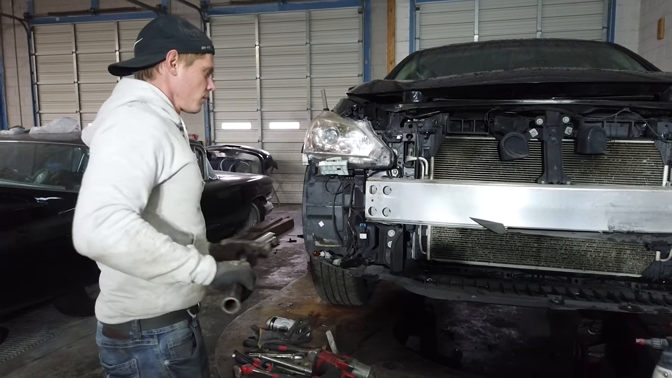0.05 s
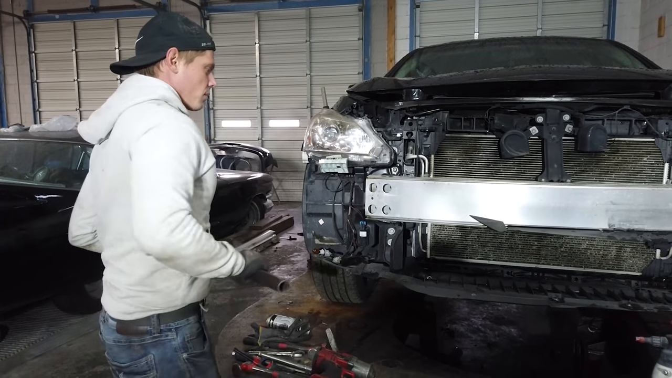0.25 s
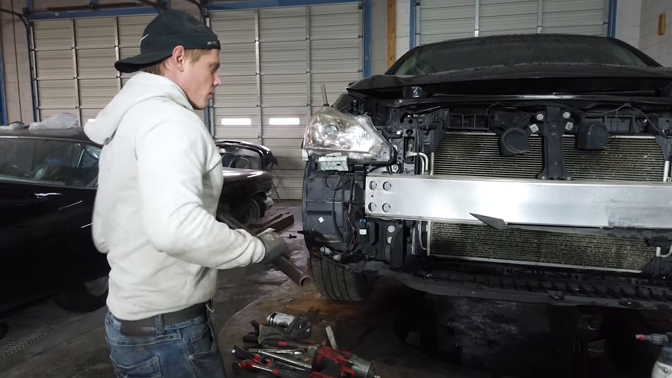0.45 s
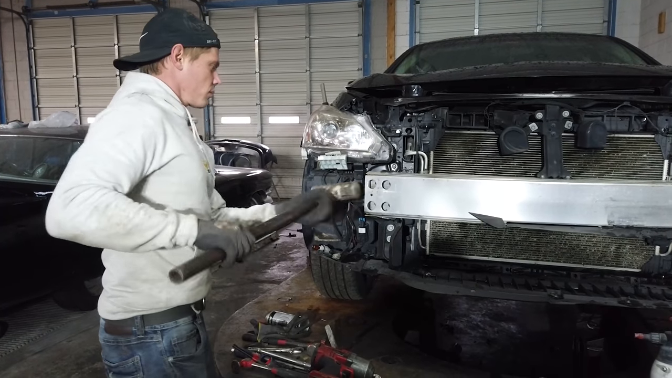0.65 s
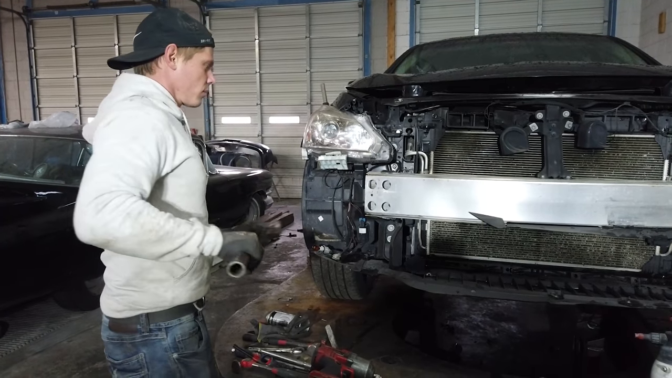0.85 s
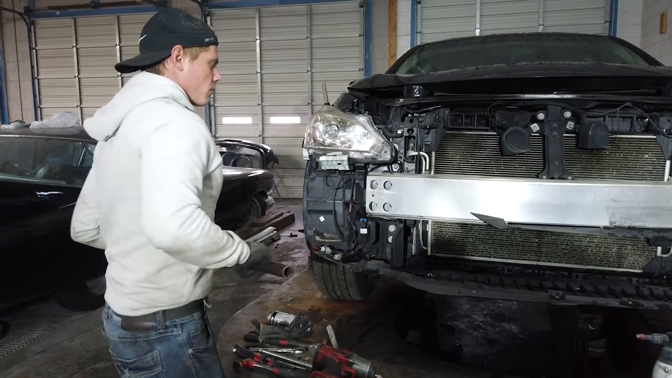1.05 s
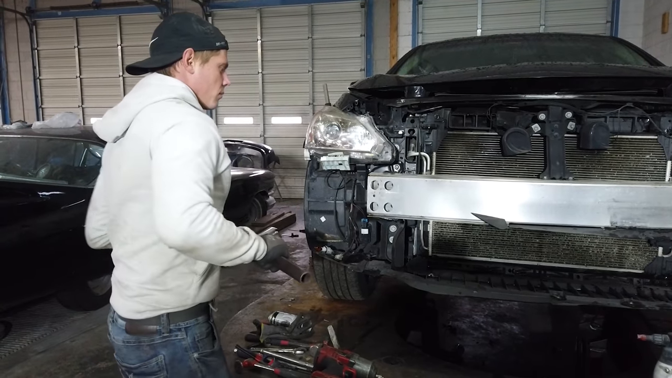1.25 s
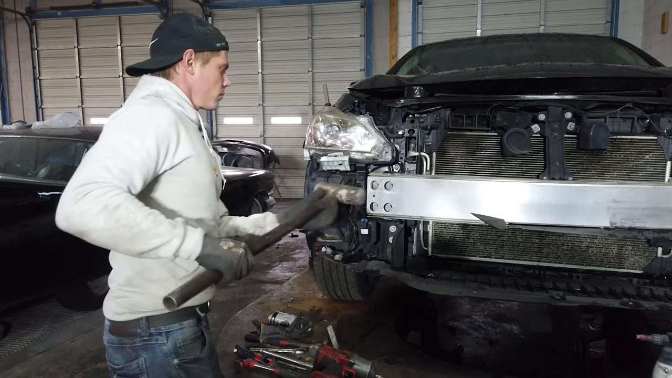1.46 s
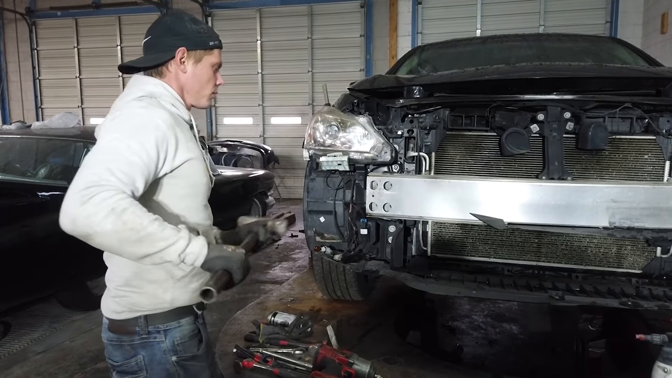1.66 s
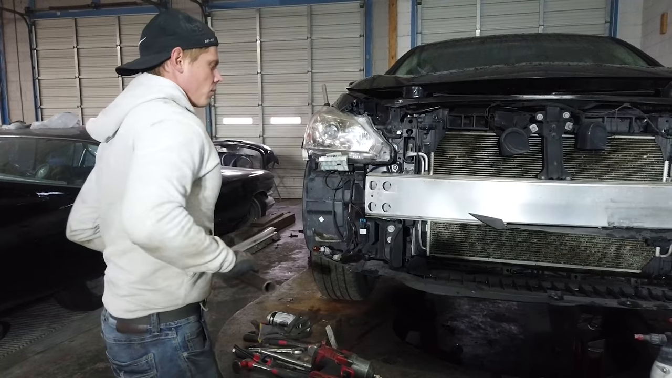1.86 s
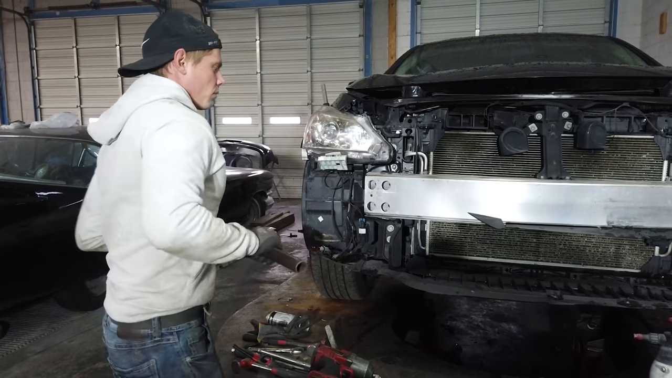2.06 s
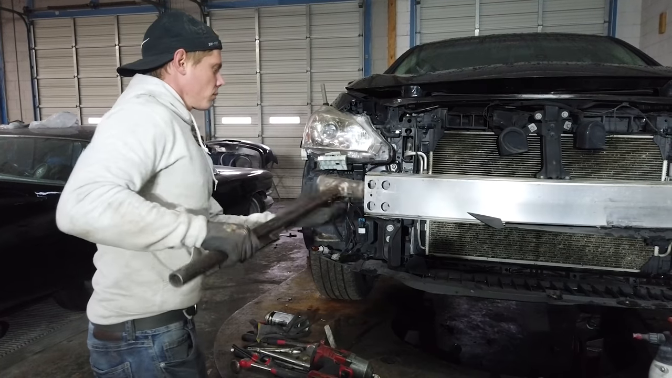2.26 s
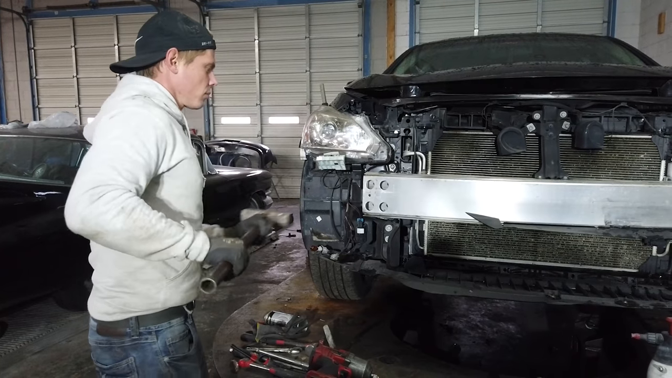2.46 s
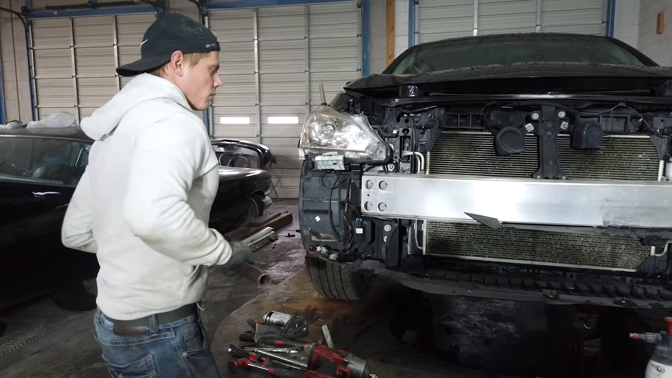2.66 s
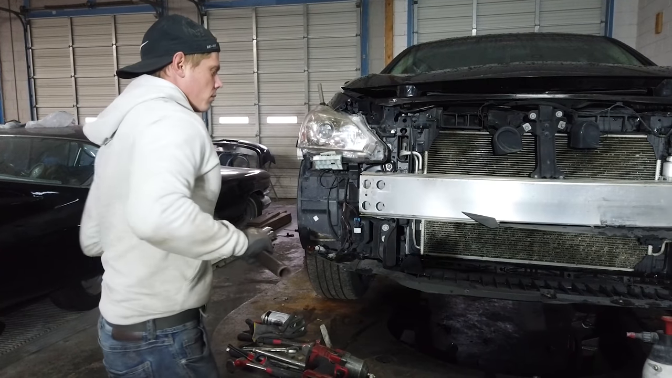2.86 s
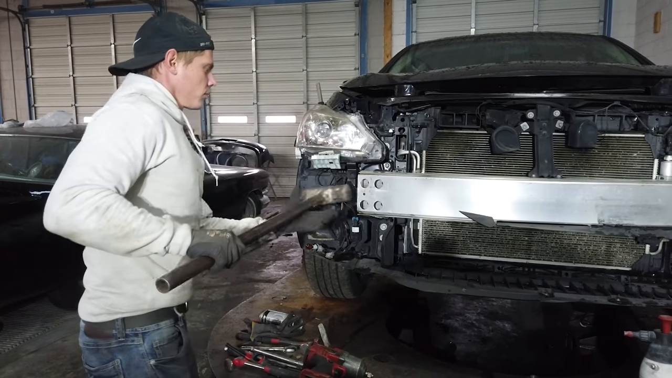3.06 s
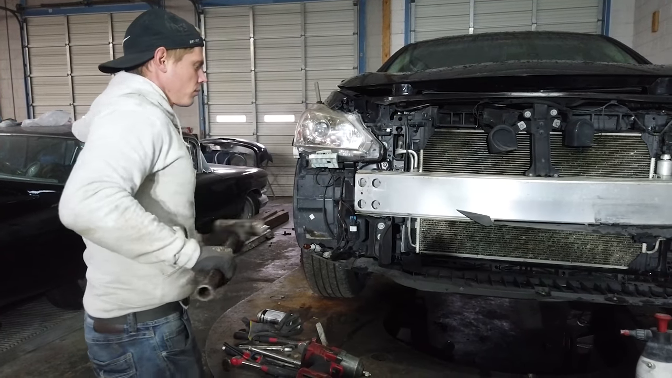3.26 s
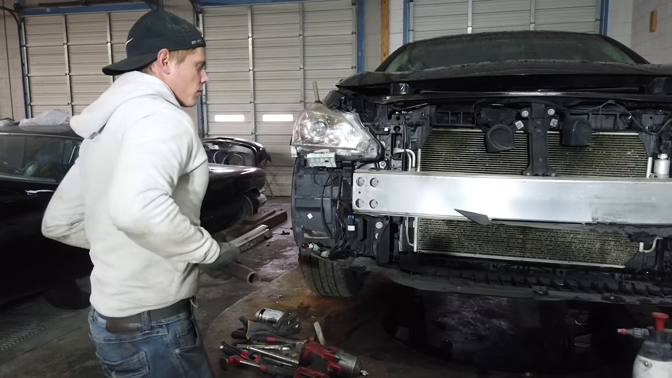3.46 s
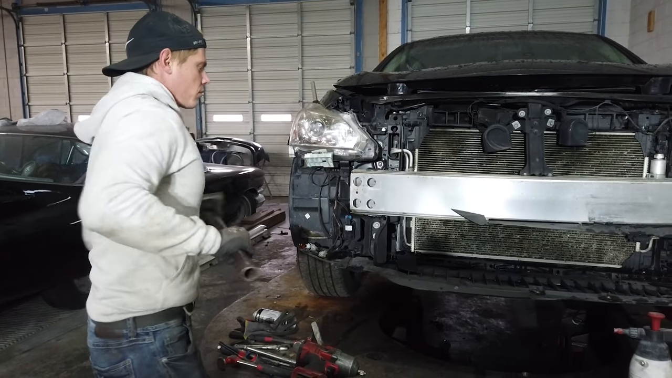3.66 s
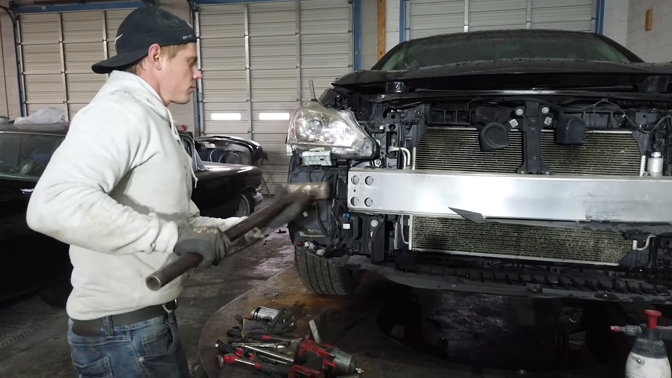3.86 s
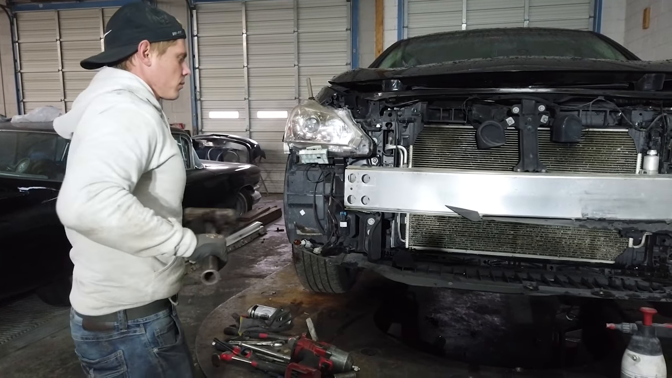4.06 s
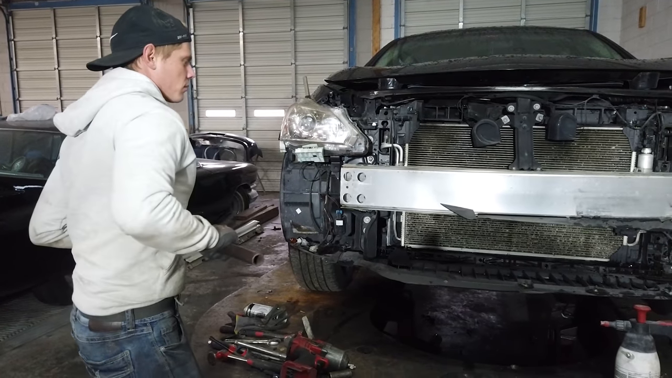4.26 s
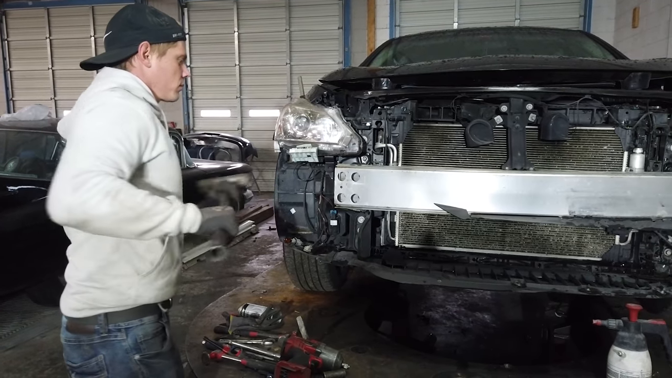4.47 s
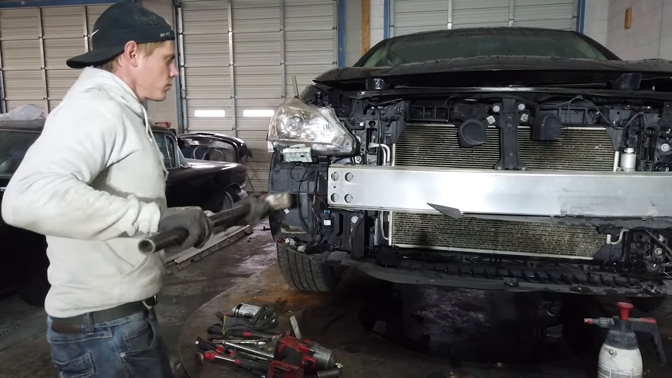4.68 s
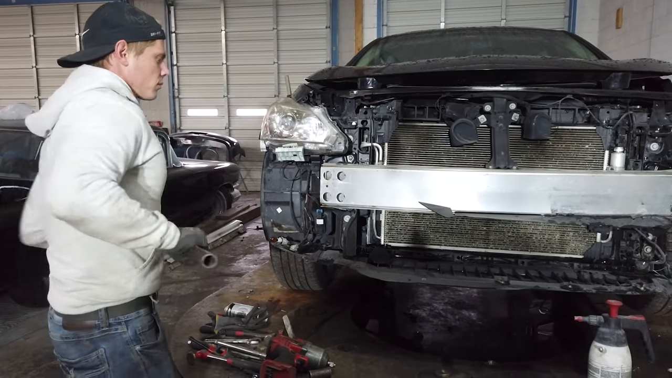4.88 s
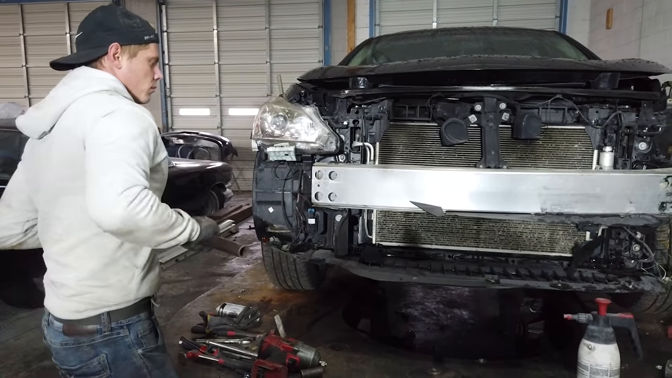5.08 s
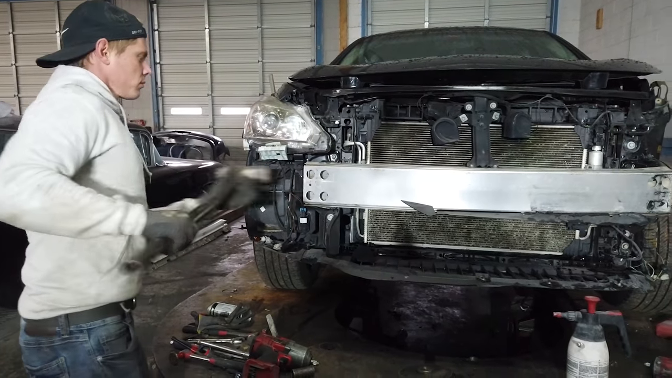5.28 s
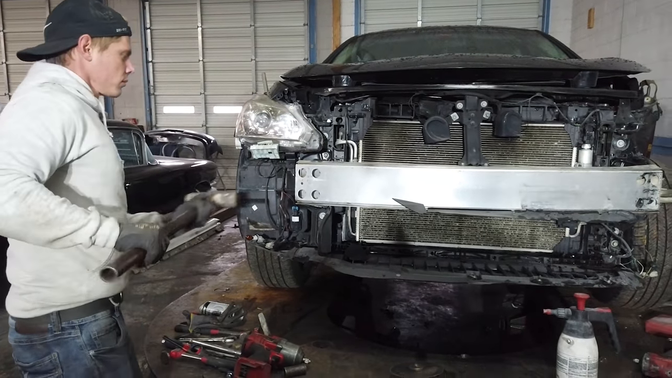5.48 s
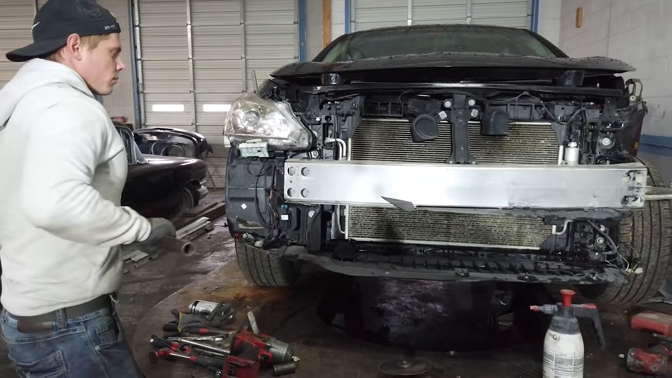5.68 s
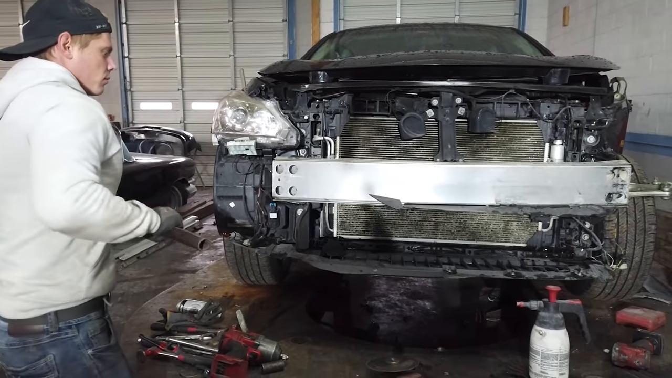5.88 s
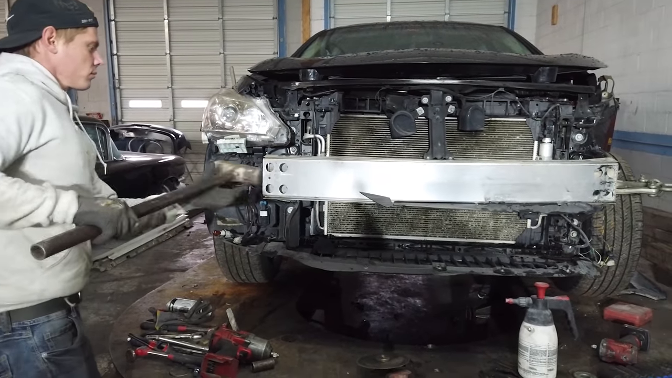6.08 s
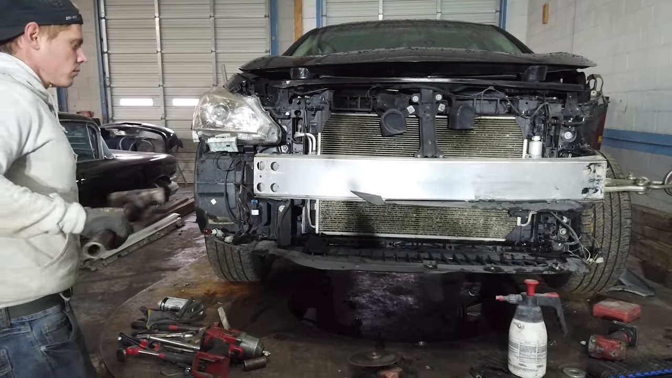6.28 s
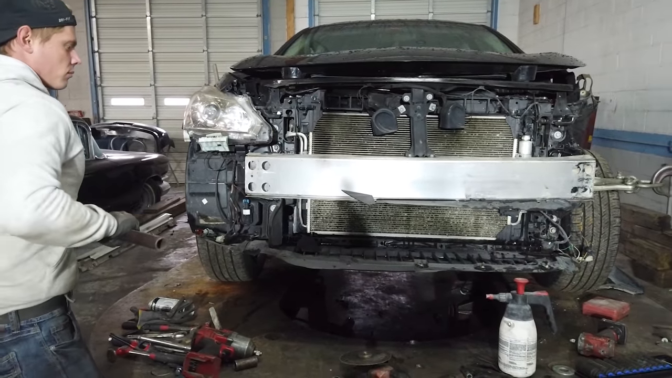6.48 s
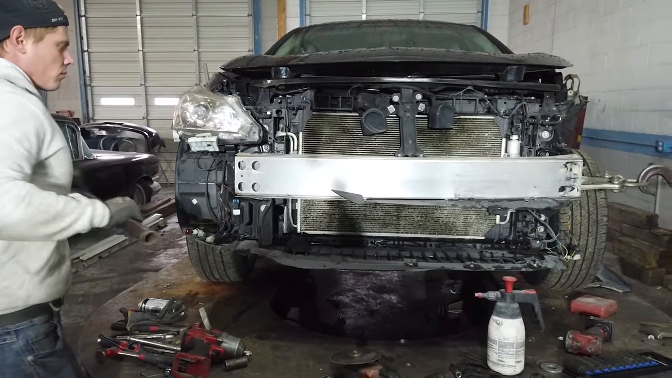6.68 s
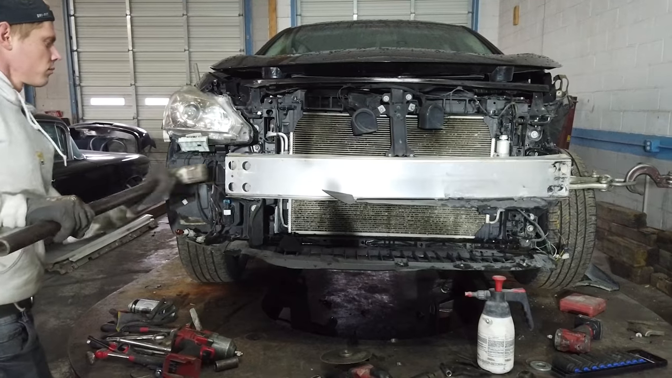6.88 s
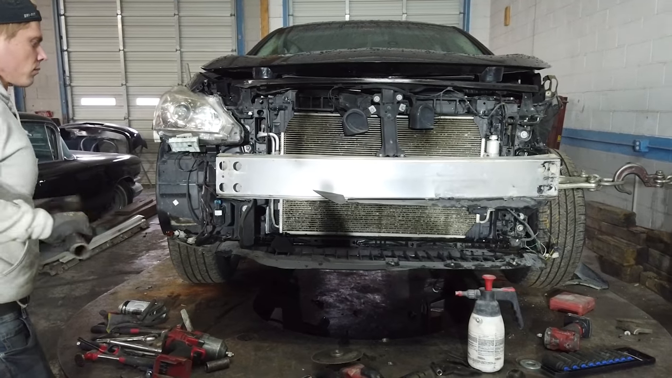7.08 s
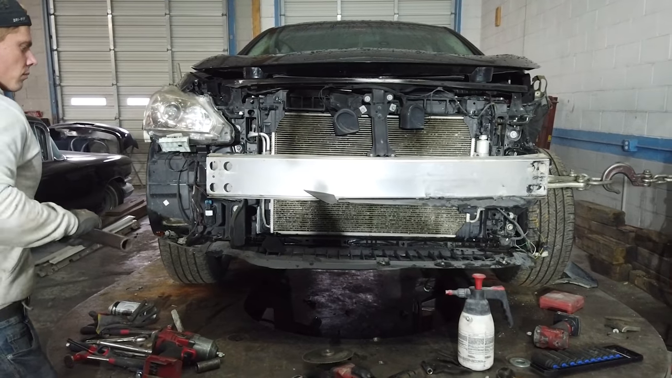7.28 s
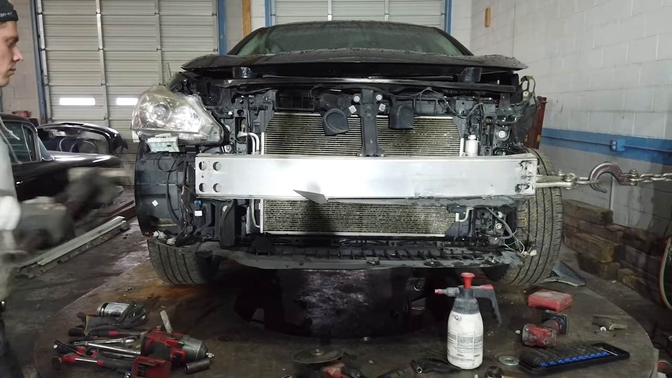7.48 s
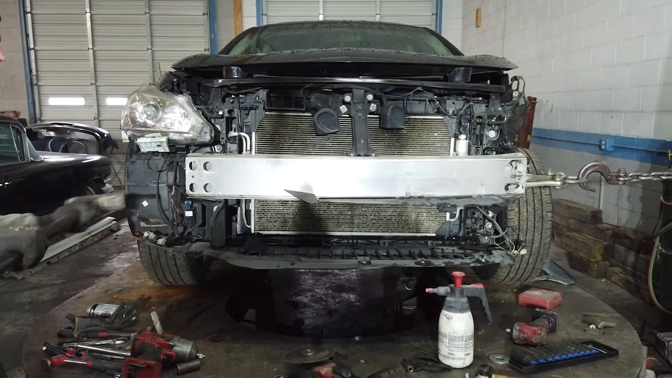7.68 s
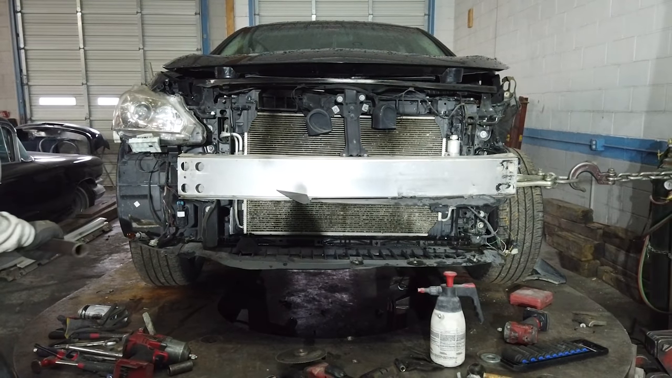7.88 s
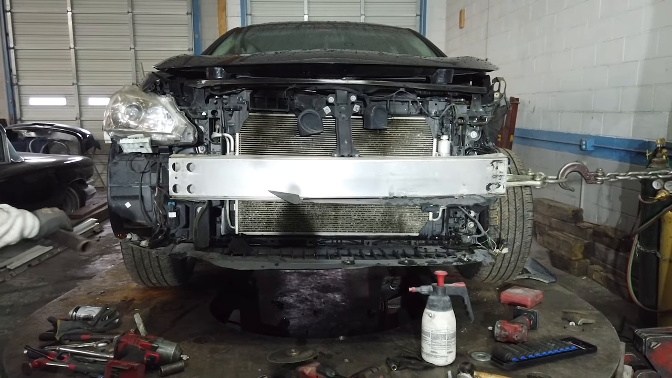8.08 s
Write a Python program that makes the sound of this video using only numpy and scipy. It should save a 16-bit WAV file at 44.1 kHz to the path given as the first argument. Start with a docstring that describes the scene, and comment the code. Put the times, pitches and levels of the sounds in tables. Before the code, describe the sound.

In a big, echoing workshop, the ring of one blow is still fading when ten more sledge hammer strikes land on a steel car frame, a little under a second apart. Each cracks and clangs, distorting the microphone a few steps away. The later hits sound slightly brighter, and a few soft metal clinks come just before the eighth. A faint, dull room tone lies underneath.

```python
"""Sledge hammer on a car frame

A sledge hammer strikes the steel frame of a car ten times, a few steps from a microphone in a large, hard
workshop; an earlier blow is still dying away at the start. Each blow is shaped noise for the crack and the
hall, with decaying pairs of sinusoids for the frame. Filtered noise makes light clinks and a quiet room tone.
The blows overload the single microphone, which clips lopsidedly and recovers with a slow swing."""
import sys
import numpy as np
from scipy import signal
from scipy.fft import rfft, irfft
from scipy.io import wavfile

SR = 44100
rng = np.random.default_rng(int(sys.argv[2]) if len(sys.argv) > 2 else 0)


def transcribe(u):
    """Save the signal u as a 16-bit wav file named by the first command-line argument.

    u: samples, shape (n,) or (channels, n), limited to [-1, 1]; the rate is SR.
    q: integer samples, one column per channel.
    """
    v = np.clip(np.atleast_2d(u).T, -1, 1)
    q = np.round(v * 32767).astype(np.int16)
    wavfile.write(sys.argv[1], SR, q)


N = 358533
LENGTH = 65536  # samples in each struck sound
AGE = np.arange(LENGTH) / SR  # seconds since the strike
HZ = np.arange(LENGTH // 2 + 1) * SR / LENGTH


def undb(db):
    """Level law: decibels to amplitude gain."""
    return 10 ** (np.asarray(db) / 20)


def over_hz(hz, points_hz, values):
    """Interpolation: straight lines between points on a log-frequency axis."""
    return np.interp(np.log(hz + 1e-9), np.log(points_hz), values)


def fade(t60):
    """Exponential damping: a loss of 60 dB in t60 seconds."""
    return np.exp(-np.log(1000) * AGE / t60)


def add(track, sound, start_s):
    """Superposition: mix a sound into the track from its start time on, trimmed to the track."""
    first = int(round(start_s * SR))
    lo, hi = max(first, 0), min(first + len(sound), N)
    if hi > lo:
        track[lo:hi] += sound[lo - first:hi - first]


def white(size):
    """White noise: the spectrum of noise with unit power per kHz."""
    return rfft(rng.standard_normal(size)) * np.sqrt(SR / 2000)


def crowd(table, noise, colour_db=0):
    """High modal density: modes too crowded to tell apart act as noise bands, each with its own decay."""
    points_hz, level_db, t60_s = np.transpose(table)
    spectrum = noise * undb(over_hz(HZ, points_hz, level_db) + colour_db)
    sound = 0
    for share, t60 in zip(np.eye(len(table)), t60_s):
        band = irfft(spectrum * over_hz(HZ, points_hz, share))  # overlaps its neighbours
        sound = sound + band * fade(t60)
    return sound


def resonances(rows, width_hz):
    """Damped resonance: gain in dB around each centre, width_hz wide at 1 kHz and wider above."""
    return sum(db / (1 + (2 * (HZ - hz) / (width_hz * np.cbrt(hz / 1000))) ** 2) for hz, db in rows)


def swing_push(hz, db):
    """Air push: one soft cycle as the swinging hammer shoves the air ahead of it, just before the crack."""
    return -undb(db) * np.sin(2 * np.pi * hz * AGE[AGE < 1 / hz])


# thump, boom, clang, bite and sizzle of an ordinary blow: pitch_hz, gain_db
BLOW_TONE = [(60, 0.5), (300, -0.12), (1000, 0.97), (3200, -2.5), (8000, 4)]


def blow_colour(force_db, hardness_db):
    """Contact time: force lifts everything; a harder, shorter contact lifts the treble (gain in dB)."""
    treble = HZ ** 2 / (HZ ** 2 + 3500 ** 2)  # half way up at 3500 Hz
    return over_hz(HZ, *np.transpose(BLOW_TONE)) + force_db + hardness_db * treble


# damped resonances of the struck rail, which trade strength as the aim shifts:
# pitch_hz, gain_db at the centre, across_db per unit of aim, up_db per unit of aim
RAIL_RESONANCES = [(500, 2, -3.4, 3.5), (670, -0.2, 2.5, -1), (868, 1, -4.5, 5), (1023, -0.5, 2, -3.5),
                   (1280, 0.7, -1, 1), (1790, 0.5, 3, 2.2), (2030, 4.1, 5.5, 0), (2200, 2, -1, 1.5),
                   (2516, 1, -4, -0.5), (2916, 2, -1, -3.5), (3240, 3, 2.5, -2), (4370, 1.3, -3.5, 1),
                   (4770, 3, 0, -3), (5000, 1.5, 2.5, -0.5), (5720, -0.3, -1.5, 0.5)]


def rail_clank(across, up, width_hz):
    """Modal nodes: moving the aim nears the nodes of some resonances and leaves others' (gain in dB)."""
    rows = [(hz, db + across * across_db + up * up_db) for hz, db, across_db, up_db in RAIL_RESONANCES]
    return resonances(rows, width_hz)


# damped resonances and dips of the panels that colour every blow: pitch_hz, gain_db
PANEL_RESONANCES = [(700, 3), (860, -5), (1070, 2.84), (1380, 2), (1560, -1.5), (1780, 2.5), (2380, 2.05),
                    (2530, -0.4), (2870, 0.5), (4680, 3), (5450, 1.7), (6720, 3.5)]


def panel_colour(width_hz):
    """Panel resonance: the same peaks and dips for every blow (gain in dB)."""
    return resonances(PANEL_RESONANCES, width_hz)


def uneven(spacing_hz):
    """Uneven modal excitation: a random ripple over frequency, gentler in the bass."""
    centres = np.arange(LENGTH // 32) * spacing_hz
    return np.interp(HZ, centres, rng.standard_normal(len(centres))) * HZ / (HZ + 700)


# bands of the crack straight from the struck steel: pitch_hz, level_db per kHz before mixing, t60_s
CRACK_BANDS = [(39.7, -15.5, 0.17), (203.4, -6, 0.017), (500, -3.5, 0.048), (1120, 1.5, 0.034),
               (1850, -7.5, 0.083), (3230, -8.5, 0.15), (5080, -17, 0.035), (8600, -33.5, 0.086),
               (15000, -44.5, .06)]


def steel_crack(colour_db):
    """Direct sound: the crack reaches the listener straight from the struck steel."""
    return crowd(CRACK_BANDS, white(LENGTH), colour_db)


# long-ringing modes of the frame, before mixing:
# pitch_hz, level_db struck at spot 0, level_db at spot 1, level_db at spot 2
FRAME_MODES = [(104, -40, -35, -35), (166, -35, -33, -33), (217, -36, -32, -30), (254, -42, -32, -32),
               (289, -35, -27, -26), (326, -29, -26, -25), (396, -33, -27, -25), (455, -28, -33, -31),
               (485, -40, -36, -35), (641, -45, -39, -35), (757, -39, -35, -32), (922, -36, -35, -37),
               (1012, -38, -34, -35), (1080, -55, -36, -36), (1333, -34, -38, -40), (1395, -37, -45, -42),
               (1723, -41, -33, -31), (2026, -40, -42, -32), (2062, -49, -44, -39), (2121, -48, -42, -40),
               (2206, -40, -36, -38), (2375, -42, -40, -40), (2825, -42, -38, -38), (2872, -41, -41, -35),
               (3268, -53, -41, -41), (4334, -42, -45, -45), (4670, -58, -40, -38), (4885, -49, -49, -44),
               (5265, -54, -58, -48), (6557, -62, -63, -53)]


def frame_table(minor_db, minor_top_hz, count=50):
    """Modal distribution: the frame's strong modes, with weaker ones scattered among and above them."""
    draws = rng.random((count, 4))
    hz = 600 + 6500 * draws[:, 0] ** 1.5
    db = minor_db - 10 * np.log10(1 + (hz / minor_top_hz) ** 4)
    spots_db = db[:, None] + 8 * (draws[:, 1:] - .5)
    return np.vstack([FRAME_MODES, np.column_stack([hz, spots_db])])


# how long the frame rings: pitch_hz, t60_s
FRAME_DECAY = [(150, 0.83), (330, 0.77), (460, 0.96), (1000, 0.88), (2100, 1.14), (4700, 0.71),
               (7000, 0.27)]


def frame_modes(hz, split_hz, twin_db):
    """Beating: each mode of the welded frame has a weaker twin nearby; sine and cosine parts."""
    # the split widens with pitch and varies at random
    split = split_hz * (1 + hz / 1500) * rng.uniform(0.46, 1.52, len(hz))
    twin_hz = hz + split * rng.choice([-1, 1], len(hz))
    phase = 2 * np.pi * np.float32([hz, twin_hz]).T[..., None] * np.float32(AGE)
    decay = np.float32([fade(t60) for t60 in over_hz(hz, *np.transpose(FRAME_DECAY))])
    decay = decay[:, None] * np.float32([[1], [undb(twin_db)]])
    return np.sin(phase) * decay, np.cos(phase) * decay


def ring(table, modes, spot, colour_db, scatter_db, bass_db):
    """Modal excitation: the spot struck decides which modes speak, with a random share for each blow."""
    hz, *spots_db = np.transpose(table)
    db = spots_db[int(round(spot))] + np.interp(hz, HZ, colour_db)
    db = db + scatter_db * rng.standard_normal(len(hz))
    db = db + bass_db / (1 + (hz / 600) ** 2)
    start_phase = np.exp(2j * np.pi * rng.random(modes[0].shape[:2]))
    push = (undb(db)[:, None] * start_phase).astype(np.complex64)
    return np.tensordot(push.real, modes[0], 2) + np.tensordot(push.imag, modes[1], 2)


# crowded modes of the body shell, held by the hall: pitch_hz, level_db per kHz before mixing, t60_s
HALL_BANDS = [(30, -25, 0.88), (65, -21.5, 1.02), (120, -19.5, 1), (220, -9, 1.01), (456, -10, 1.076),
              (522, -18, 1.21), (1180, -19, 1.29), (1750, -19, 1.16), (2200, -20.5, 1.216),
              (3320, -20, 1.07), (5010, -28, 0.87), (6200, -35.5, 0.78), (8440, -42, 0.57),
              (15500, -58, 0.12)]


def hall_wash(noise, colour_db=0):
    """Reverberation: the body shell's crowded modes die away in the hall."""
    return crowd(HALL_BANDS, noise, colour_db)


# blows: start_s, spot struck (0-2), force_db, hardness_db of treble,
# aim across and aim up the spot (each about -1 to 1); force and hardness before the crack's emphasis
HAMMER_BLOWS = [(-0.09, 0, -2, 2.7, -1, 1), (0.727, 1, 1.5, -2.5, -0.11, 0.056),
                (1.547, 1, 0.5, -2.5, 0.43, 0.13), (2.352, 1, -1.2, -1.5, -0.89, 0.97),
                (3.119, 1, -1.06, 0, -0.89, 0.15), (3.8863, 2, -0.1, 3, 0.63, 0.052),
                (4.652, 2, 0.94, 0, 0.68, -0.5), (5.4048, 2, -0.64, 1, -1.1, -0.14),
                (6.1639, 2, 0.43, 0.8, 0.71, 0.35), (6.911, 2, 0.3, 0.2, 0.43, -0.45),
                (7.628, 2, 0.3, 0.1, -0.91, -1.06)]
# first echoes off the floor, the doors and the side wall: delay_s, level_db relative to the crack
FIRST_ECHOES = [(.008, -13.5), (.026, -11.5), (0.039, -11.5)]


def hammer(crack_db, ring_db, hall_db, build_s, alike, ripple_db, crack_focus, force_gain):
    """Direct and reflected sound: crack and echoes, then ring and wash build as reflections pile up."""
    out, shared_paths = np.zeros(N), white(LENGTH)
    table = frame_table(minor_db=-44.5, minor_top_hz=3300)
    modes = frame_modes(table[:, 0], split_hz=4.03, twin_db=-5.0)
    puff = swing_push(hz=757, db=-24)
    alike = np.clip(alike, 0, 1)
    build = 1 - np.exp(-AGE / build_s)
    for start_s, spot, force_db, hardness_db, across, up in HAMMER_BLOWS:
        tone_db = blow_colour(force_db, hardness_db)
        body_db = rail_clank(across, up, width_hz=131) + panel_colour(width_hz=145)
        body_db = body_db + ripple_db * uneven(spacing_hz=44.64)
        # heard straight from the steel, force and resonances stand out more than in the hall
        crack = undb(crack_db) * steel_crack(force_gain * tone_db + crack_focus * body_db)
        # the same shell in the same hall: part of the fine pattern returns with every blow
        paths = np.sqrt(alike) * shared_paths + np.sqrt(1 - alike) * white(LENGTH)
        wash = undb(hall_db) * hall_wash(paths, tone_db + body_db)
        tones = undb(ring_db) * ring(table, modes, spot, tone_db, scatter_db=3.2, bass_db=4.0)
        add(out, puff, start_s - len(puff) / SR)
        add(out, crack + build * (wash + tones), start_s)
        for delay_s, echo_db in FIRST_ECHOES:
            add(out, undb(echo_db) * crack, start_s + delay_s)
    return out


# quiet workshop air: pitch_hz, level_db per kHz
AIR_SPECTRUM = [(25, -42.5), (70, -70.5), (160, -53), (450, -55.5), (800, -71), (2000, -70.5), (5000, -94),
                (9000, -100), (15000, -112)]


def air():
    """Stationary noise: a dull, steady room tone."""
    noise = white(N)
    hz = np.arange(len(noise)) * SR / N
    return irfft(noise * undb(over_hz(hz, *np.transpose(AIR_SPECTRUM))), N)


# light clinks of loose metal: start_s, level_db
CLINK_TIMES = [(5.156, -25), (5.303, -47), (5.359, -38)]
# bands of one clink: pitch_hz, level_db per kHz before the clink's own level, t60_s
CLINK_BANDS = [(100, -23, 0.11), (400, -7.5, 0.22), (1010, -10, 0.13), (3500, -13, 0.059), (6000, -35, .06),
               (9800, -43, .04), (15000, -66, .03)]


def clinks(hall_db, rise_s):
    """Light impact: loose metal knocks softly between blows and barely wakes the hall."""
    out = np.zeros(N)
    rise = 1 - np.exp(-AGE / rise_s)
    for start_s, level_db in CLINK_TIMES:
        knock = crowd(CLINK_BANDS, white(LENGTH)) + undb(hall_db) * hall_wash(white(LENGTH))
        add(out, undb(level_db) * knock * rise, start_s)
    return out


def scene():
    """Superposition at one point: all sounds reach one microphone, so both channels are the same."""
    blows = hammer(crack_db=-5.0, ring_db=1.03, hall_db=-2.5, build_s=0.0079, alike=0.26,
                   ripple_db=2.5, crack_focus=1.54, force_gain=1.43)
    mono = blows + air() + clinks(hall_db=-20, rise_s=0.0018)
    return np.array([mono, mono])


def overload(x, top, bottom, knee):
    """Saturation: rounded clipping with separate headroom upwards and downwards."""
    limit = np.where(x > 0, top, bottom)
    return x / (1 + np.abs(x / limit) ** knee) ** (1 / knee)


def bias_sag(excess, depth, recover_hz):
    """Bias shift: what is clipped off drags the microphone's bias, up to a limit; it creeps back."""
    drag = np.tanh(np.abs(excess))
    return depth * signal.sosfilt(signal.butter(1, recover_hz, fs=SR, output="sos"), drag)


def record(dry):
    """Overload and coupling: the microphone clips and sags, a high-pass swings back, the top is cut."""
    clipped = overload(dry, top=.53, bottom=.66, knee=2.44)
    sagged = clipped - bias_sag(dry - clipped, depth=12.6, recover_hz=2.35)
    coupled = signal.sosfilt(signal.butter(2, 4.5, "high", fs=SR, output="sos"), sagged)
    rounded = signal.sosfilt(signal.butter(1, 14000, fs=SR, output="sos"), coupled)
    return signal.sosfilt(signal.ellip(8, .2, 70, 16000, fs=SR, output="sos"), rounded)


dry = scene()
out = record(dry)
transcribe(out)
```